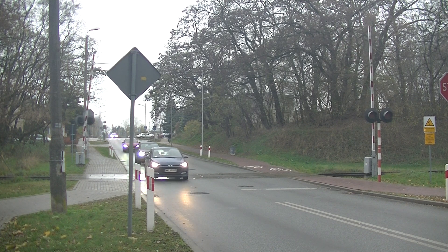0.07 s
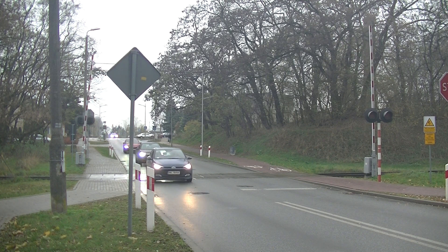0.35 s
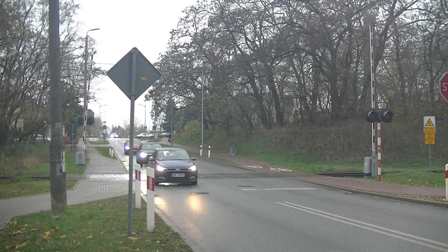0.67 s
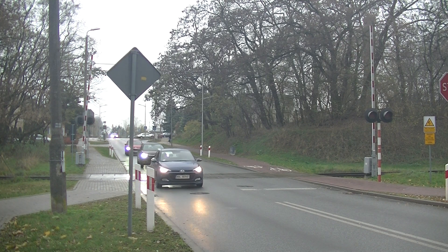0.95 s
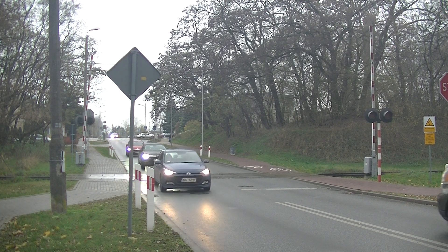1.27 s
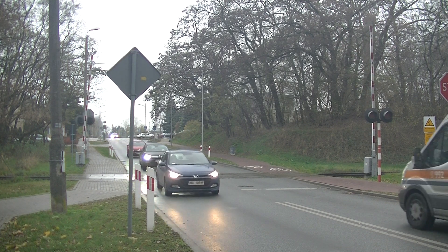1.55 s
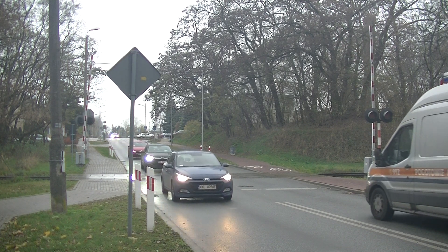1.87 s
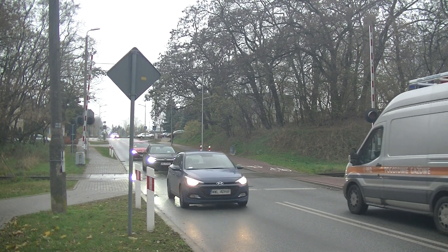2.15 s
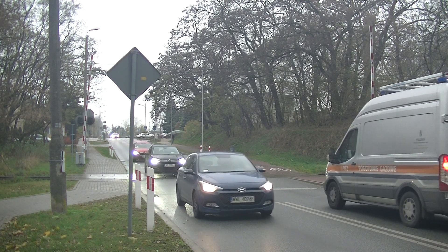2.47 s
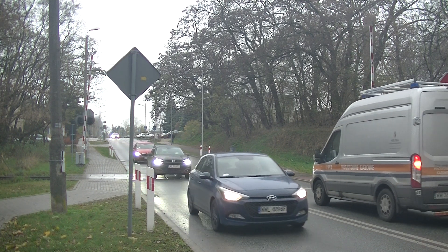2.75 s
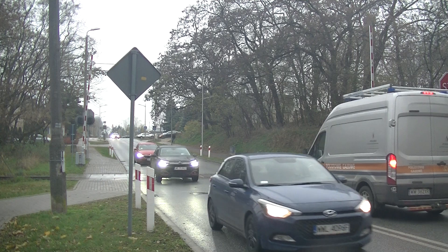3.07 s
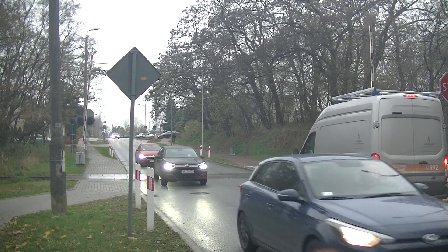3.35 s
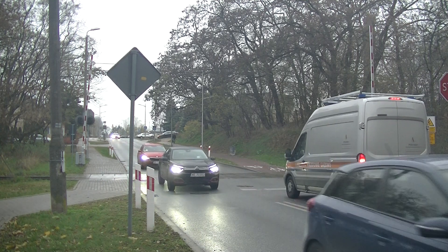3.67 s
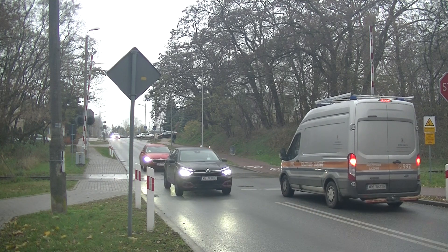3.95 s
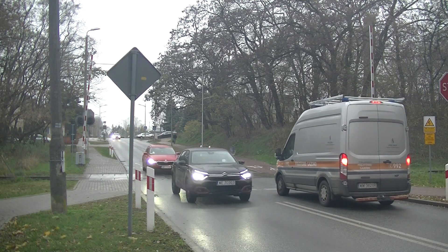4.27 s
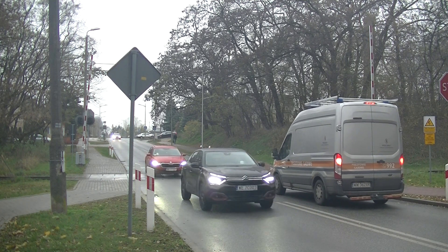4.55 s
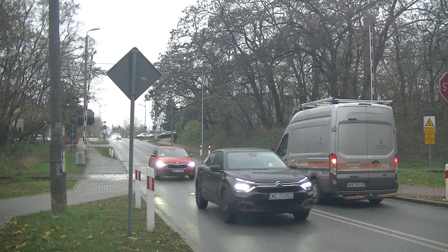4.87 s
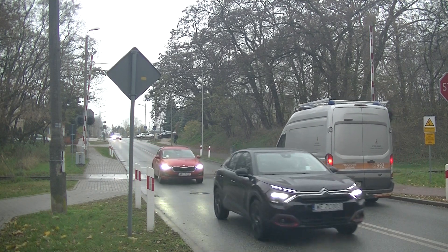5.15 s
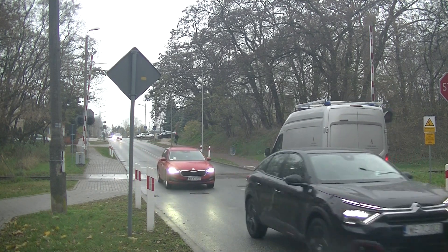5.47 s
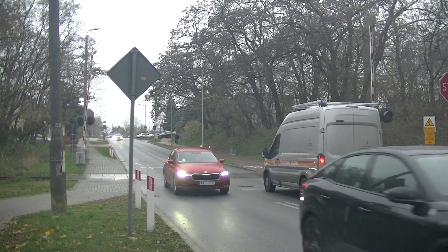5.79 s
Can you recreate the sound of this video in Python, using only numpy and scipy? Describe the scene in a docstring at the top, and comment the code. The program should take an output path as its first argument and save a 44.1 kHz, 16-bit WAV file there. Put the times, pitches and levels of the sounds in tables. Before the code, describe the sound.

Wet tyre hiss swells as two cars drive by in turn, with traffic further off and an engine softly revving.

```python
"""Tyres of two cars roar and hiss on a wet road, passing close to a microphone on the verge.
Their colour and stereo image shift as each car nears, draws level and leaves; the tread grooves ring.
Traffic sounds further up the road, and a vehicle in the far lane throws spray.
An engine revs up, then drops as the first car passes; another hums as the second car nears.
Grit cracks, drops snap off the treads, a vehicle squeaks."""
import sys
import numpy as np
from scipy import signal
from scipy.fft import rfft, irfft
from scipy.io import wavfile

SR = 44100
rng = np.random.default_rng(int(sys.argv[2]) if len(sys.argv) > 2 else 0)


def put_to_file(sound):
    """Save the sound as 16-bit audio at rate SR, in the file named by the first command-line argument."""
    columns = np.atleast_2d(sound).T  # one column per channel
    safe = np.clip(columns, -1, 1)
    whole_steps = np.round(safe * 32767)
    wavfile.write(sys.argv[1], SR, whole_steps.astype(np.int16))


N = 265482
T = np.arange(N) / SR
HZ = np.fft.rfftfreq(N, 1 / SR)
FALL_DB_PER_DECADE = 35  # distance loss over the grass verge

# traffic up the road: t/s, level/dB
TRAFFIC = [(0, -30), (1.3, -30), (2.6, -33.5), (4.2, -42), (6.02, -28)]
# close cars: t alongside/s, tyre level/dB, span/s (passing distance over speed), groove re tyres/dB
PASSES = [(3.85, -20.5, 0.83, -14.5), (5.99, -22, 0.97, -10.5)]
# tyre spectrum by aspect: f/Hz, relative level/dB
FAR_SPECTRUM = [(25, -41), (60, -35), (130, -20), (250, -14.5), (430, -7), (540, -5), (680, -1), (900, 1.5),
                (1100, 0), (1550, -4), (2000, -4.5), (3000, -1), (4000, -5), (6000, -11.5), (9000, -27.5),
                (15500, -37)]
COMING_SPECTRUM = [(25, -42), (60, -36), (130, -28), (260, -23), (315, -17), (420, -11.5), (560, -11),
                   (690, -4), (800, -2.5), (1000, 0), (1400, -0.5), (1800, 1.5), (2300, -0.5), (4000, -3),
                   (6000, -12), (9000, -25), (15500, -38)]
BESIDE_SPECTRUM = [(25, -46), (60, -41), (130, -29), (260, -22), (315, -12), (380, -12), (580, -8),
                   (900, 3.5), (1400, 0), (2000, 0), (4000, 1), (6000, -6.5), (6900, -8), (9000, -19),
                   (15500, -29)]
LEAVING_SPECTRUM = [(25, -47), (60, -31), (130, -32), (250, -14.5), (500, -7), (900, 1.5), (1400, 1),
                    (1700, -5.5), (2050, -4.5), (2330, 1.5), (2600, -2), (4000, -1.5), (6000, -6),
                    (9000, -30), (15500, -42)]
# image at the two microphone ports, by aspect: f/Hz, coherence, left lead/rad, left re right/dB
FAR_PORTS = [(100, 0.73, -0.3, -2), (350, 0.94, 0.0, -4), (1000, 0.9, 0.3, -2), (1900, 0.87, -0.0, -1),
             (2800, 0.82, -0.1, -3), (4200, 0.91, -0.2, -1), (4900, 0.4, -1.4, -3), (5400, 0.29, -0.2, -7),
             (6200, 0.75, -0.0, -1), (7500, 0.75, -1.0, 2), (8700, 0.59, -1.5, -4), (10200, 0.67, -0.4, 0),
             (11500, 0.47, -2.3, -1), (15000, 0.57, -2.5, -1)]
COMING_PORTS = [(100, 0.84, -0.3, -2), (350, 0.97, 0.1, -4), (1000, 0.95, 0.3, -2), (1900, 0.99, 0.0, 0),
                (2800, 0.92, -0.2, -3), (4200, 0.96, 0.2, -2), (4900, 0.78, 0.3, -3), (5400, 0.61, 1.1, 2),
                (6200, 0.85, -0.2, 5), (7500, 0.67, -0.9, 5), (8700, 0.51, -1.1, -6),
                (10200, 0.79, -0.0, -3), (11500, 0.66, -0.1, -1), (15000, 0.75, -0.0, -1)]
BESIDE_PORTS = [(100, 0.93, -0.2, -2), (350, 0.99, 0.0, -4), (1000, 0.98, 0.1, -2), (1900, 0.97, -0.1, -1),
                (2800, 0.92, -0.1, -5), (4200, 0.93, -0.0, -1), (4900, 0.46, -1.1, -4),
                (5400, 0.43, 0.9, -5), (6200, 0.8, -0.3, 3), (7500, 0.8, -1.5, 4), (8700, 0.56, -1.5, -5),
                (10200, 0.82, -0.2, -2), (11500, 0.44, -1.3, -1), (15000, 0.51, -2.2, -1)]
LEAVING_PORTS = [(100, 0.87, -0.2, -2), (350, 0.98, -0.0, -4), (1000, 0.95, -0.0, -1),
                 (1900, 0.73, -0.4, -1), (2800, 0.34, -0.9, -2), (4200, 0.5, -0.5, -4),
                 (4900, 0.27, -0.6, -9), (5400, 0.39, -0.6, -7), (6200, 0.53, -0.6, -3),
                 (7500, 0.47, -1.2, 1), (8700, 0.31, -2.4, -4), (10200, 0.4, -0.7, -3),
                 (11500, 0.24, 3.0, -2), (15000, 0.17, -2.6, -5)]
# microphone housing resonances: f/Hz, gain/dB
HOUSING = [(700, 0.6744), (1000, -1), (1250, 0.1), (1850, 3), (2700, -1), (4200, 2), (4700, -2),
           (5300, -0.3), (6000, -2.5), (6900, 4), (8300, 1.3), (9700, 4.5), (11000, -3.5), (13500, 2.5)]
# groove tones of distant cars: t/s, level/dB, span/s, f/Hz
FAR_GROOVES = [(0.17, -38, 0.075, 880), (0.35, -45, 0.42, 790), (1.0, -42.5, 0.1, 900)]
# wheel mist, far lane then first car: t/s, level/dB
MIST_LEVEL = [(0, -64.5), (1.5, -58), (2.3, -72), (3.1, -74), (3.5, -48), (4.12, -46), (4.26, -76)]
# mist spectrum: f/Hz, relative level/dB
MIST_SPECTRUM = [(4000, -40), (8000, -6), (11000, 3), (13500, 4), (15500, -8)]
# grit under the tyres: t/s, level/dB, ring f/Hz, decay/s
GRIT = [(.5169, -18.5, 3000, .0005), (1.1151, -16.5, 4080, .0003), (1.4309, -17, 3460, .0003),
        (2.7652, -13, 3400, .0003), (2.9169, -17, 2400, .0003), (3.6511, -8, 3000, .00025),
        (4.5869, -15.5, 2000, .0003), (4.7899, -16, 2040, .0005), (4.8103, -10.5, 2150, .0007)]
# drops off the treads: t/s, peak/dB, f/Hz, decay/s
DROPS = [(.535, -28.5, 7300, 0.0029), (3.944, -17, 6900, 0.0038), (4.521, -21.5, 6200, .0012),
         (4.649, -24.5, 5900, .0012)]
# engine runs: t/s, firing f/Hz, level before exhaust/dB
REVVING_RUN = [(1.4, 48.4, -73), (1.75, 54, -67), (1.98, 57.6, -58.5), (3.02, 73.8, -58),
               (3.5, 81.3, -57.5), (3.8, 85, -56.5), (4.1, 81.5, -62), (4.4, 77, -64), (4.7, 66, -67)]
HATCHBACK_RUN = [(4.6, 48.4, -71), (4.95, 49.88, -58), (6.02, 55.5, -59)]
# exhaust resonances: f/Hz, gain/dB
REVVING_EXHAUST = [(55, -14), (68, -13.5), (82, -10), (120, -22), (145, -14), (163, -4.5), (185, -8),
                   (205, -16), (225, -5.5), (248, -4), (280, -17), (305, -7), (325, 2), (350, 7), (360, 5),
                   (370, -2), (385, -6), (405, 1.5), (432, 5.5), (455, 1), (485, -3), (498, 9), (510, 12),
                   (550, -12), (650, -25)]
HATCHBACK_EXHAUST = [(52, -10), (108, -8), (160, -16), (205, 0.5), (225, -2), (265, -13), (330, -1.5),
                     (400, -4), (455, 6), (600, -14)]
# firing harmonics, first upward: gain/dB
REVVING_ORDERS_DB = [0.5, 2, 2, -2, -0.5, 2.5, -11]
HATCHBACK_ORDERS_DB = [-3, -3.5, 7, 0.5, -4, 1, 0, 0]
# body and wheel rushes: t/s, level/dB, span/s, f/Hz, width/Hz
SWISHES = [(3.64, -39.5, 0.36, 760.3, 390), (3.56, -32.5, 0.25, 1750, 450), (3.9, -34, 0.17, 1580, 570),
           (3.77, -27, 0.18, 2905, 1840), (3.92, -39.5, 0.11, 5600, 1300), (6, -33, 0.81, 1300, 310)]


def gain_of(db):
    """dB to amplitude."""
    return 10 ** (np.asarray(db) / 20)


def unit_rms(x):
    """Scale to rms 1."""
    return x / np.sqrt(np.mean(x ** 2) + 1e-20)


def pan_right(db):
    """Stereo gains: left down, right up by db."""
    return gain_of([[-db], [db]])


def over_hz(rows):
    """Table columns at each FFT bin, on a log axis."""
    hz, *columns = np.transpose(rows)
    return [np.interp(np.log(HZ + 1), np.log(hz), c) for c in columns]


def over_time(rows):
    """Table columns at each sample."""
    t_s, *columns = np.transpose(rows)
    return [np.interp(T, t_s, c) for c in columns]


def drift(rate_hz):
    """Random wander of rms 1, up to about rate_hz."""
    return unit_rms(irfft(rfft(rng.standard_normal(N)) * np.exp(-(HZ / rate_hz) ** 2), N))


def low_pass(x, hz):
    """24 dB/octave above hz."""
    return irfft(rfft(x) / (1 + (HZ / hz) ** 4), N)


def high_pass(x, hz):
    """12 dB/octave below hz."""
    return irfft(rfft(x) * HZ ** 2 / np.hypot(HZ ** 2, hz ** 2), N)


def passing_db(at_s, span_s):
    """Level of a source on a straight path, re its nearest point."""
    return -FALL_DB_PER_DECADE * np.log10(np.hypot(1, (T - at_s) / span_s))


def bearing(at_s, turn_s=.55):
    """-1 nearing, 0 alongside, 1 leaving."""
    return np.tanh((T - at_s) / turn_s)


def noise_band(level_db, hz, width_hz):
    """Noise around hz; level and centre may move."""
    baseband = drift(width_hz) + 1j * drift(width_hz)
    carrier = np.exp(2j * np.pi * np.cumsum(hz * np.ones(N)) / SR)
    return gain_of(level_db) * unit_rms((baseband * carrier).real)


def passing_band(at_s, db, span_s, hz, width_hz, glide_hz_per_s=0):
    """Noise band that swells to at_s, then fades."""
    return noise_band(db + passing_db(at_s, span_s), hz + glide_hz_per_s * (T - at_s), width_hz)


def wet_tread(drops_per_s=900, spread_db=4.5, drops_db=-6.5):
    """Raw tyre spectrum: a dense rush plus droplets bursting in the treble."""
    size = gain_of(spread_db * np.minimum(rng.exponential(1, N), 3.8))
    drops = unit_rms(size * rng.choice([-1, 1], N) * (rng.random(N) < drops_per_s / SR))
    return rfft(rng.standard_normal(N)) + gain_of(drops_db) * rfft(drops) * HZ / np.hypot(HZ, 2500)


def tyre_noise(spectrum, ports):
    """One aspect at both ports: direct sound is shared, scattered sound is not."""
    coherence, lead_rad, balance_db = over_hz(ports)
    coherence = np.clip(coherence, 0, 1)
    direct = np.sqrt(coherence) * wet_tread()
    scattered = np.sqrt(1 - coherence) * np.array([wet_tread(), wet_tread()])
    left = gain_of(balance_db / 2) * np.exp(.5j * lead_rad)
    image = np.array([left, 1 / left])
    image /= np.linalg.norm(image, axis=0)
    colour = gain_of(over_hz(spectrum)[0] + over_hz(HOUSING)[0])
    return unit_rms(irfft((direct + scattered) * image * colour, N))


def tyres(nearing_per_s=0.068):
    """Each vehicle's power crossfades between aspects: 0 far, 1 coming, 2 beside, 3 leaving."""
    aspects = [(FAR_SPECTRUM, FAR_PORTS), (COMING_SPECTRUM, COMING_PORTS),
               (BESIDE_SPECTRUM, BESIDE_PORTS), (LEAVING_SPECTRUM, LEAVING_PORTS)]
    traffic = (over_time(TRAFFIC)[0], nearing_per_s * T)
    cars = [(db + passing_db(at_s, span_s), 2 + bearing(at_s)) for at_s, db, span_s, _ in PASSES]
    power = np.zeros((len(aspects), N))
    for level_db, aspect in [traffic] + cars:
        offset = aspect - np.arange(len(aspects))[:, None]
        power += gain_of(level_db) ** 2 * np.maximum(1 - abs(offset), 0)
    return sum(np.sqrt(p) * tyre_noise(*a) for p, a in zip(power, aspects))


def wet_road(tyre, rumble_hz=600, spray_hz=4500, thinning_db_per_s=0.78):
    """Coarse patches swell the rumble; the uneven water film churns, its spray wavering and thinning."""
    rumble = low_pass(tyre, rumble_hz)
    spray = tyre - low_pass(tyre, spray_hz)
    middle = tyre - rumble - spray
    rumble_db = 0.5 + 0.5 * drift(4.1)
    spray_db = 0.45 - thinning_db_per_s * T + 0.5 * drift(25)
    churn_db = 0.25 * drift(14) + 0.43 * drift(90)
    return (middle + rumble * gain_of(rumble_db) + spray * gain_of(spray_db)) * gain_of(churn_db)


def grooves(pipe_hz=1019.6, climb_hz_per_s=55, doppler=.03, road_wander=.035, overtone_ratio=1.91):
    """Tread grooves ring as short pipes; pitch climbs with speed and drops as the car passes."""
    tone = sum(passing_band(*row, width_hz=50) for row in FAR_GROOVES)
    for at_s, db, span_s, groove_db in PASSES:
        source_hz = pipe_hz + climb_hz_per_s * np.minimum(T - at_s, 0)
        hz = source_hz * (1 - doppler * bearing(at_s) + road_wander * drift(7))
        level_db = db + groove_db + passing_db(at_s, span_s)
        tone += noise_band(level_db, hz, width_hz=85)
        tone += noise_band(level_db - 3, hz * overtone_ratio, width_hz=150)
    return tone * pan_right(.7)


def mist(flicker_db=0.5):
    """The finest spray fizzes unevenly, loudest with a wheel close."""
    level_db = over_time(MIST_LEVEL)[0] + flicker_db * drift(14)
    return gain_of(level_db) * tyre_noise(MIST_SPECTRUM, BESIDE_PORTS)


def grit(scatter_db=-21, scatter_s=.005, low_cut_hz=900):
    """Each grain cracks for a cycle or two; wheel arch and road scatter it briefly."""
    out = np.zeros(N)
    for at_s, db, hz, decay_s in GRIT:
        age_s = np.maximum(T - at_s, 0)
        crack = np.sin(2 * np.pi * hz * age_s) * np.exp(-age_s / decay_s)
        scatter = noise_band(scatter_db, hz, hz / 2) * (T >= at_s) * np.exp(-age_s / scatter_s)
        out += gain_of(db) * (crack / abs(crack).max() + scatter)
    return high_pass(out, low_cut_hz) * pan_right(1)


def drop_snaps(width_ratio=0.19):
    """Drops spat off the treads, each a short, pitched noise burst."""
    out = np.zeros(N)
    for at_s, peak_db, hz, decay_s in DROPS:
        puff = rng.standard_normal(N) * (T >= at_s) * np.exp(-abs(T - at_s) / decay_s)
        burst = irfft(rfft(puff) * np.exp(-((HZ - hz) / (width_ratio * hz)) ** 2), N)
        out += gain_of(peak_db) * burst / abs(burst).max()
    return out


def engine(run, exhaust, orders_db, roughness, waver=0.003, rasp_per_order=0.041, fade_s=0.33):
    """Firing harmonics slide through exhaust resonances; uneven firing frays the higher ones."""
    firing_hz, level_db = over_time(run)
    cycles = np.cumsum(firing_hz * (1 + waver * drift(10.2))) / SR
    tones = np.zeros(N)
    for order, order_db in enumerate(orders_db, 1):
        exhaust_db = np.interp(order * firing_hz, *np.transpose(exhaust))
        unevenness = 1 + roughness * drift(5.7) + order * rasp_per_order * drift(35)
        rms = gain_of(level_db + order_db + exhaust_db) * unevenness
        tones += rms * np.sqrt(2) * np.cos(2 * np.pi * (order * cycles + rng.random()))
    inside_s = np.minimum(T - run[0][0], run[-1][0] - T)
    fade = np.clip(1 + inside_s / fade_s, 0, 1)
    return fade * tones * pan_right(1.5)


def far_lane_wake():
    """Water thrown back by treads in the far lane: one hiss at both ports."""
    hiss = passing_band(at_s=1.54, db=-34, span_s=0.4, hz=3780.5, width_hz=830, glide_hz_per_s=300)
    return hiss * gain_of([[-1.5], [1]])


def swishes(low_cut_hz=260):
    """Rushes of air and spray as body and wheels draw level."""
    return high_pass(sum(passing_band(*row) for row in SWISHES), low_cut_hz) * pan_right(1)


def tailpipe():
    """The first car's tailpipe turns to the microphone: a breathy drone and a falling note."""
    drone = passing_band(at_s=4, db=-52, span_s=0.5, hz=295, width_hz=90, glide_hz_per_s=-35.5)
    note = passing_band(at_s=4, db=-55, span_s=0.08, hz=238.5, width_hz=7, glide_hz_per_s=-110)
    return (drone + note) * pan_right(1.7)


def car_wake():
    """Water thrown back by the first car: separate hiss per port, stronger on the road side."""
    hiss = [passing_band(at_s=4.68, db=-39.7, span_s=0.38, hz=5450, width_hz=880) for port in range(2)]
    return np.array(hiss) * gain_of([[1], [8]])


def squeak():
    """A brief rising squeak from a passing vehicle."""
    return passing_band(at_s=4.804, db=-31.5, span_s=0.02, hz=2480, width_hz=160, glide_hz_per_s=1500)


def scene():
    """Tyres and spray over two engines."""
    revving = engine(REVVING_RUN, REVVING_EXHAUST, REVVING_ORDERS_DB, roughness=0.28)
    hatchback = engine(HATCHBACK_RUN, HATCHBACK_EXHAUST, HATCHBACK_ORDERS_DB, roughness=0.27)
    engines = revving + hatchback + tailpipe()
    wakes = far_lane_wake() + car_wake()
    transients = drop_snaps() + grit() + squeak()
    return wet_road(tyres()) + grooves() + swishes() + mist() + wakes + engines + transients


def record(dry):
    """Band limit at 15750 Hz."""
    taps = signal.firwin(1023, 15750, window=("kaiser", 9), fs=SR)
    return signal.oaconvolve(dry, taps[None], "same")


dry = scene()
out = record(dry)
put_to_file(out)
```